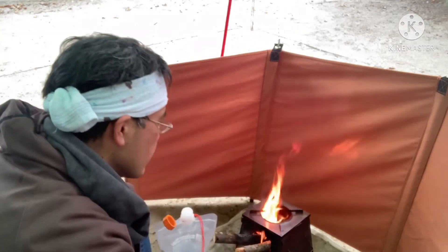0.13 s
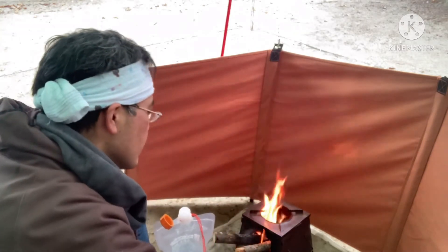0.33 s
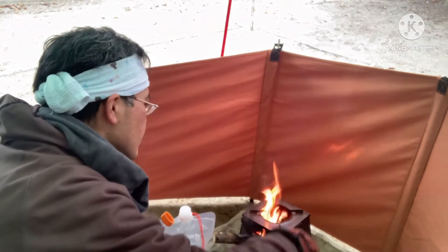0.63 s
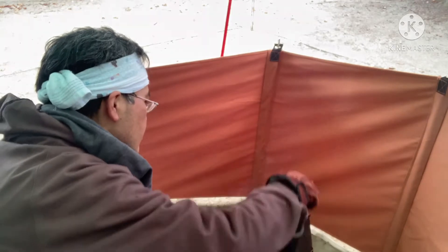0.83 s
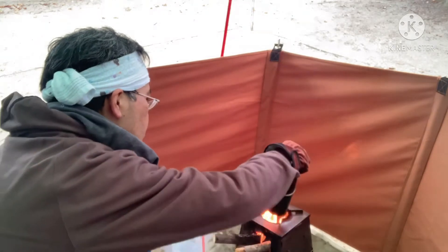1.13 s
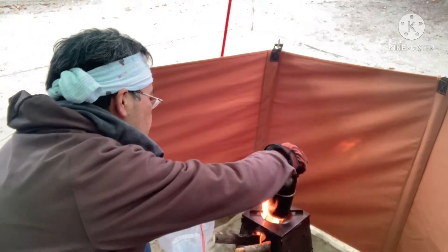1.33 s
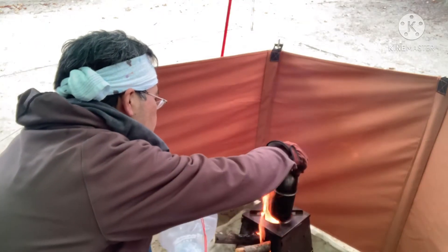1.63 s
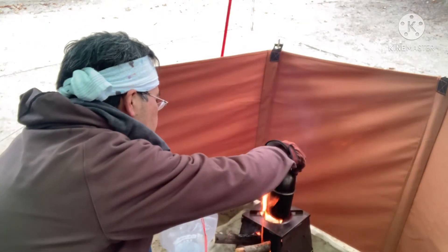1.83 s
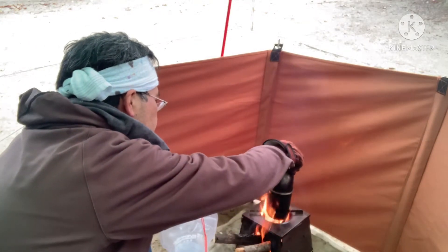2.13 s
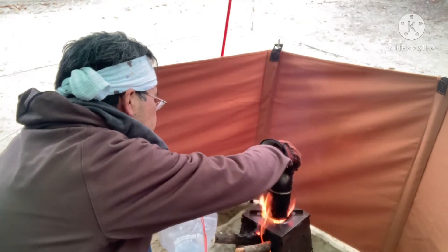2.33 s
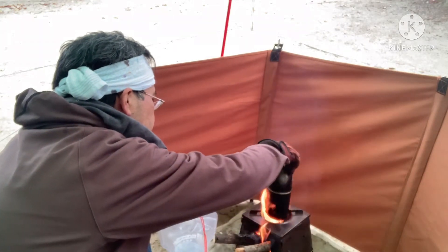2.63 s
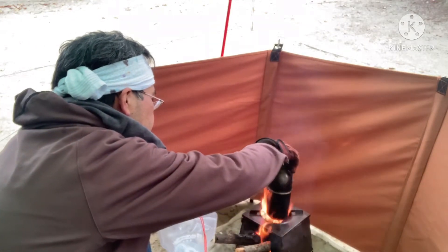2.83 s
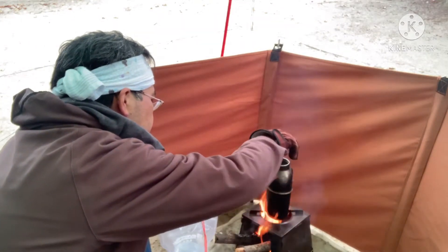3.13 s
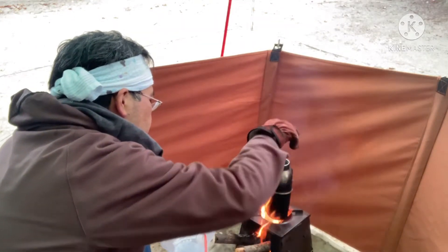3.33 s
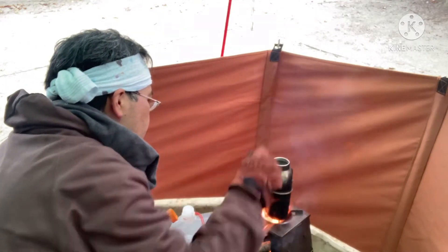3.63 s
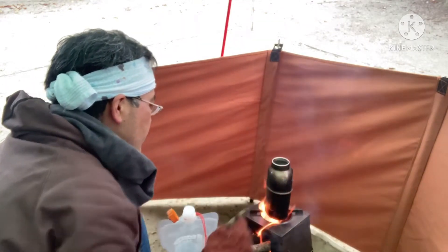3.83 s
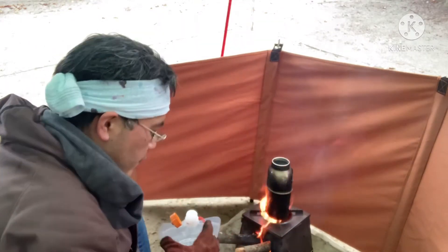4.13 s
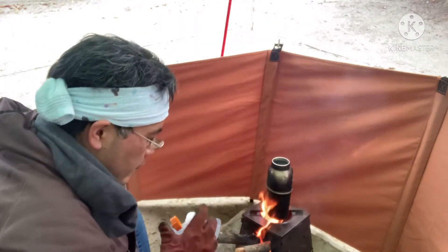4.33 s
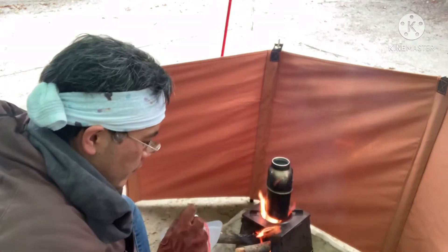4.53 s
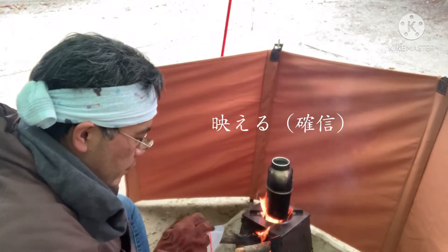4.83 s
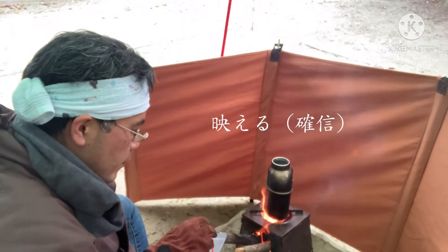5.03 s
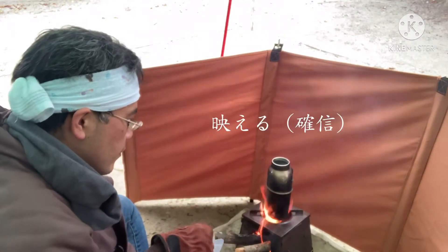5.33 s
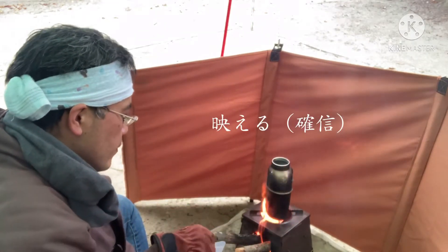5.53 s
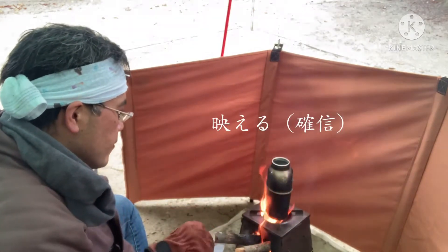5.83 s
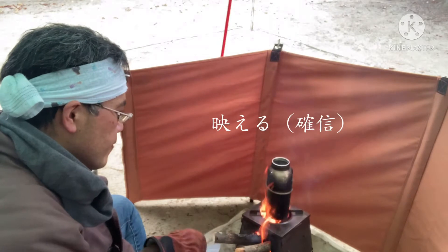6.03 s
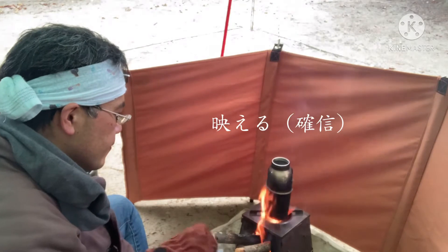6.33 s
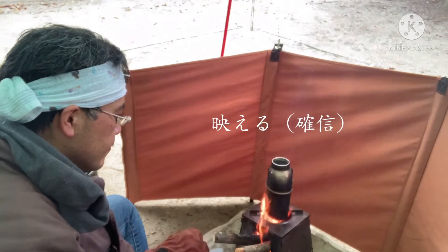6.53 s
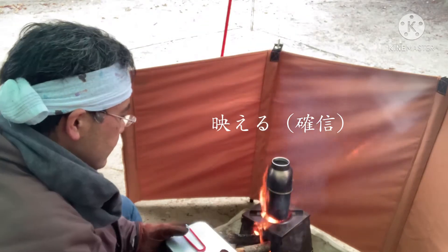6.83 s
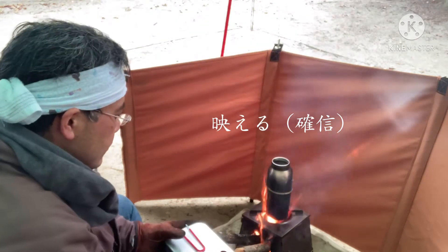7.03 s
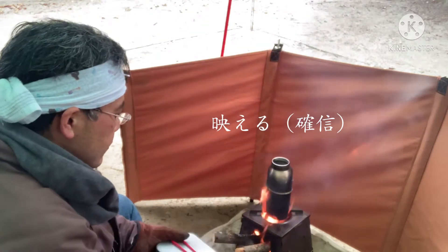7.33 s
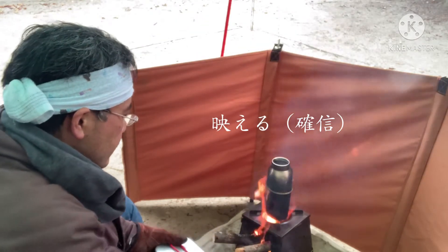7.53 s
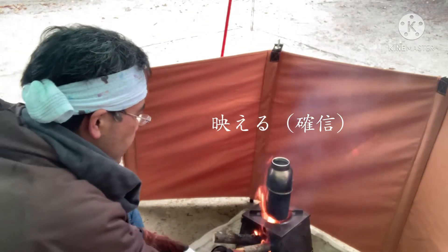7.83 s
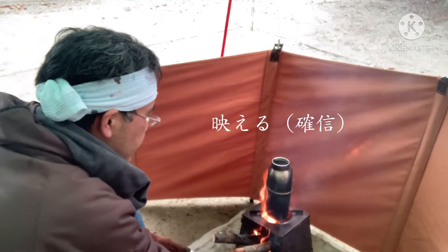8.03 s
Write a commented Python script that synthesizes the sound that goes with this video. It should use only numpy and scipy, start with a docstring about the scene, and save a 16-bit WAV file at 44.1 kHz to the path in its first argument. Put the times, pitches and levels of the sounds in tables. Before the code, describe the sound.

A close stereo pickup in a rain shelter: broadband rain wash, dense small taps on taut cloth and wet little blips throughout. Tiny dry fire snaps and short steam hisses come at random. One bright steel clank with a short ring is followed by two faint nudges and a tiny squeak. Midway, plastic knocks hollowly, one much louder; after a brief fade out and in, a jacket rustles and bumps softly.

```python
"""Steady rain patters on a tarp, as damped swings of taut cloth over a broadband wash and bubble blips.
Filtered noise makes a low rumble; bursts of noise make a small wood fire tick and sizzle in a steel camp stove.
A steel bottle clanks on the stove as a sum of decaying modes, then scrapes through friction resonances.
Later hollow plastic gear knocks with its own modes as it is put down, and a jacket rustles as shaped noise.
The level dips briefly near the end."""
import sys
import numpy as np
from scipy import signal
from scipy.fft import rfft, irfft, next_fast_len
from scipy.io import wavfile
from scipy.ndimage import uniform_filter1d, map_coordinates

SR = 44100
rng = np.random.default_rng(int(sys.argv[2]) if len(sys.argv) > 2 else 0)


def store_pcm(level_fs):
    """Save levels as 16-bit WAV."""
    pcm = np.round(np.clip(level_fs, -1, 1) * 32767).astype(np.int16)
    wavfile.write(sys.argv[1], SR, np.atleast_2d(pcm).T)


N = 361619

# relative noise spectrum of plastic scuffing on the ground: freq_hz, density_db (per Hz)
SCUFF_SPECTRUM = [(300, 3), (1000, 5.5), (2800, -0.5), (4500, -6.5), (8000, -21), (16000, -31.5)]


def amp(db):
    """Level law: decibels to an amplitude factor."""
    return 10 ** (np.asarray(db) / 20)


def unit(x):
    """Power normalisation: x scaled to rms 1."""
    return x / np.sqrt(np.mean(x ** 2) + 1e-20)


def along(points, hz):
    """Interpolation of (frequency, value) points on a logarithmic frequency axis."""
    point_hz, value = np.transpose(points)
    return np.interp(np.log(hz + 1), np.log(point_hz), value)


def curves(rows):
    """Linear interpolation in time: one value per sample for each column after the time."""
    s, *columns = np.transpose(rows)
    return [np.interp(np.arange(N) / SR, s, column) for column in columns]


def wobble(rate):
    """Band-limited random modulation: a smooth curve through rate random knots a second."""
    knots = rng.standard_normal(int(N * rate / SR) + 4)
    return map_coordinates(knots, [np.arange(N) * rate / SR])


def filtered(x, response):
    """Linear filtering: the spectrum of x times a response of frequency."""
    n = x.shape[-1]
    m = next_fast_len(n + 4096)
    return irfft(rfft(x, m) * response(np.fft.rfftfreq(m, 1 / SR)), m)[..., :n]


def noise(spectrum, size):
    """Diffuse-field coherence: coloured stereo noise of rms 1, nearly mono in the bass."""
    # correlation of left and right: freq_hz, likeness (-1 to 1)
    likeness = [(50, 1), (130, 0.87), (300, 0.63), (700, -0.18), (1500, 0.56), (4000, 0.46)]

    def response(hz):
        turn = np.arccos(np.clip(along(likeness, hz), -1, 1)) / 2  # shares power between mid and side
        return amp(along(spectrum, hz)) * [np.cos(turn), np.sin(turn)]

    mid, side = filtered(rng.standard_normal((2, size)), response)
    return unit(np.array([mid + side, mid - side]))


def fade(t, t60):
    """Exponential damping: a decay of 60 dB in t60 seconds."""
    return np.exp(-np.log(1000) * t / t60)


def ring(modes, t):
    """Modal superposition: damped modes, struck at slightly random strengths and at random phases."""
    return sum(amp(db + rng.standard_normal()) * fade(t, t60)
               * np.sin(2 * np.pi * (hz * t + rng.random())) for hz, db, t60 in modes)


def add(track, s, sound):
    """Linear superposition: mix a sound into a stereo track at time s."""
    part = track[:, max(round(s * SR), 0):][:, :sound.shape[-1]]
    part += sound[..., :part.shape[1]]


def strokes(rows):
    """Speed of a rubbing movement (s, length s, dB): the gain rises and falls in a smooth bell."""
    t = np.arange(N) / SR
    return sum(amp(db) * np.exp(-(2 * (t - s) / length) ** 2) for s, length, db in rows)


def patchy(x, depth_db):
    """Time-frequency modulation: stereo sound at rms 1 whose colour shifts in small random patches."""
    z = signal.stft(x, nperseg=256)[2]
    field = rng.standard_normal(z.shape[1:])
    field = uniform_filter1d(field, size=4, axis=0)
    field = uniform_filter1d(field, size=7, axis=1)
    shifted = z * amp(depth_db * unit(field))
    return unit(signal.istft(shifted, nperseg=256)[1][:, :x.shape[1]])


def taps(s, db, hz, pan_db, cycles, spread_s):
    """Damped membrane: a drop dents taut cloth, which swings about once and reaches each microphone at a lag."""
    steps = np.arange(256)
    lag = spread_s * rng.uniform(-1.022, 1, len(s))
    place = (np.round(s * SR).astype(int)[:, None] + steps).ravel().clip(0)
    pair = []
    for side in (1, -1):
        delay = (spread_s + side * lag[:, None]) / 2
        phase = np.maximum(steps / SR - delay, 0) * hz[:, None]
        dent = np.sin(np.pi * phase) ** 2 * np.exp(-phase / cycles)
        swing = np.gradient(dent, axis=1)  # the air follows the speed of the cloth
        swing /= np.abs(swing).max(axis=1, keepdims=True)
        level = amp(db + side * pan_db / 2)[:, None]
        pair.append(np.bincount(place, (level * swing).ravel(), N)[:N])
    return np.array(pair)


def patter(per_s, centre_hz, octaves, size_db):
    """Random arrivals: countless small taps of random place, pitch and size, at rms 1."""
    u = rng.random((int(per_s * N / SR), 3))
    hz = np.clip(centre_hz * 2 ** (octaves * rng.standard_normal(len(u))), 500, 12000)
    size = np.minimum(-np.log(1 - u[:, 1]), 3.2)  # exponential spread of sizes
    pan_db = 4 * (2 * u[:, 2] - 1)
    return unit(taps(u[:, 0] * N / SR, size_db * size, hz, pan_db, cycles=0.69, spread_s=0.000394))


def drips():
    """Bubble resonance: drops into shallow water leave tiny bubbles, short blips of rising pitch, at rms 1."""
    per_s, middle_hz, spread_octaves = 55, 1950, 0.493
    life_cycles, rise_per_s, size_db = 3.3, 4, 2.5  # the pitch rises by this share of itself a second
    out, t = np.zeros((2, N)), np.arange(SR // 40) / SR
    for when, pitch, size, place in rng.random((int(per_s * N / SR), 4)):
        hz = middle_hz * 2 ** (spread_octaves * np.arctanh(0.98 * (2 * pitch - 1)))
        turns = hz * t * (1 + rise_per_s * t / 2)
        life = (1 - np.exp(-turns)) * np.exp(-turns / life_cycles)
        lag = np.array([[1], [-1]]) * (place - 0.5) * 0.5  # cycles, opposite at the two microphones
        level = amp(size_db * min(-np.log(1 - size), 3))
        add(out, when * N / SR, level * life * np.sin(2 * np.pi * (turns + lag)))
    return unit(out)


def shelter(x, echo_s, echo_db, tail_db, t60):
    """Early reflections: ground and windscreen return a quick echo and a short scatter."""
    t = np.arange(SR // 8) / SR
    tail = rng.standard_normal((2, len(t))) * fade(t, t60)
    answer = amp(tail_db) * tail / np.linalg.norm(tail[0])
    answer[:, 0] += 1  # the direct sound
    answer[:, round(echo_s * SR)] += amp(echo_db)
    return signal.fftconvolve(x, answer, axes=1)[:, :N]


def rain():
    """Summed random impacts: a far wash, splashes and drips on the ground, and drops of all sizes on the tarp."""
    # the shower eases and picks up again: time_s, level_db (before the offset of each layer)
    rain_course = [(0, -49), (0.6, -51), (1.7, -49), (2.15, -50.5), (2.45, -52), (3.1, -50.5), (3.5, -54),
                   (3.75, -49), (4.25, -52), (4.9, -50), (5.6, -50.5), (6.25, -52.5), (6.75, -46.5),
                   (7.0, -47), (8.2, -48.5)]
    # relative spectrum of the far wash: freq_hz, density_db (per Hz)
    wash_spectrum = [(60, -15), (200, -7), (450, 5.5), (900, 2), (1700, -5), (3000, -2), (5000, -7.5),
                     (7500, -10.5), (11000, -21), (16000, -17.5)]
    # big drops just overhead: start_s, peak_db, pitch_hz, left_minus_right_db
    big_drops = [(0.016, -26.5, 1930, -2), (0.180, -19.5, 1120, 4), (0.478, -28, 1580, -3),
                 (0.507, -28, 1250, -8), (0.75, -34, 2300, 1), (0.835, -26.5, 1420, 8),
                 (0.911, -31.5, 1150, 0), (1.079, -32, 1500, 0), (1.224, -27.5, 940, 10),
                 (1.251, -29.5, 986, 5.5), (1.558, -23, 1620, 4), (2.194, -25, 1690, 0),
                 (2.364, -28.5, 2090, 3), (2.675, -27, 1590, 0), (2.776, -33.5, 1200, 2),
                 (2.958, -29.5, 1200, 0), (3.040, -31, 2700, 3), (3.118, -32, 1100, 1.5),
                 (3.615, -21.5, 1540, -1), (3.696, -21, 1910, -3), (3.729, -26, 1370, -5),
                 (3.842, -29.5, 1800, -2.5), (3.949, -29, 1500, -1), (4.195, -33.5, 1300, -4),
                 (4.269, -35, 1020, 11), (4.313, -28, 1580, -1), (4.435, -27, 1460, -1.5),
                 (4.461, -25, 1290, -1), (4.477, -27, 1350, 0), (4.626, -25.5, 2537, 4),
                 (4.720, -31, 1310, -1), (5.237, -27.5, 1300, -8), (5.316, -29.5, 1450, 0),
                 (5.437, -19, 3500, 1), (6.382, -27, 1850, 0), (6.407, -21, 1720, -2),
                 (6.867, -21, 1800, -1), (7.069, -26, 1280, 0), (7.092, -21, 1920, 1),
                 (7.426, -26, 1916, 2.5), (7.646, -27, 1340, 2), (7.803, -22.5, 2070, 2),
                 (7.824, -27.5, 1250, -6), (7.878, -27.5, 2000, 0), (7.959, -21.5, 1130, -3),
                 (8.035, -29, 900, 4), (8.108, -28.5, 2000, 0), (8.19, -24, 2100, 1)]
    flutter_db, flutters_per_s = 0.5, 9  # chance swells of the whole shower
    rain_db = curves(rain_course)[0] + flutter_db * wobble(flutters_per_s)

    wash_db = rain_db - 4.4 + 2.2 * wobble(14)
    wash = amp(wash_db) * patchy(noise(wash_spectrum, N), depth_db=3.0)
    splash_db = rain_db - 9.0 + 4.0 * wobble(14)
    splashes = patter(per_s=650, centre_hz=3850, octaves=0.52, size_db=5.0)
    splash = amp(splash_db) * patchy(splashes, depth_db=2.5)

    small_drops = patter(per_s=420, centre_hz=2130, octaves=0.73, size_db=5.5)
    small = amp(rain_db - 7.0) * patchy(small_drops, depth_db=2.5)
    medium_drops = patter(per_s=30, centre_hz=1710, octaves=0.44, size_db=0.5)
    medium = amp(rain_db - 9) * patchy(medium_drops, depth_db=3.5)
    blips = amp(rain_db - 11) * drips()
    big = taps(*np.transpose(big_drops), cycles=0.23, spread_s=0.00014)
    near = small + medium + big + blips
    return wash + splash + shelter(near, echo_s=0.0051, echo_db=-11.0, tail_db=-3.5, t60=0.077)


def rumble():
    """Low-frequency noise: the rumble of the outdoors, swaying by chance around its slow course."""
    # slow course of the rumble: time_s, level_db
    rumble_course = [(0, -36), (0.45, -40.5), (1.0, -37.5), (1.9, -39), (3.7, -37.5), (4.1, -40.5),
                     (5.1, -39.5), (5.8, -37.5), (6.9, -40), (7.6, -37), (7.87, -42), (8.2, -37)]
    # relative spectrum of the rumble: freq_hz, density_db (per Hz)
    rumble_spectrum = [(15, -21), (28, -32), (42, -7), (55, -1), (70, -3), (95, -6.5), (130, -14.5),
                       (200, -24.5), (350, -32), (900, -68)]
    sway_db, sways_per_s = 0.5, 8
    level_db = curves(rumble_course)[0] + sway_db * wobble(sways_per_s)
    return amp(level_db) * noise(rumble_spectrum, N)


def fire():
    """Impulsive and turbulent noise: wood splits in tiny snaps, and moisture escapes in short sizzles."""
    # dry snaps of burning wood: start_s, level_db, tilt_db_per_octave
    snap_rows = [(0.350, -35, 1.5), (0.507, -36, -1), (0.79, -32.5, -1.5), (0.835, -39, -1),
                 (0.922, -40, 0.5), (1.251, -39, 2.5), (2.194, -29, -0.5), (2.217, -36, -0.5),
                 (2.248, -37.5, 0), (2.66, -39, 0.5), (2.82, -41, 2), (3.040, -31, 0), (3.118, -39, 1),
                 (3.22, -40.5, 1), (3.452, -33, -1), (3.614, -28, 0.5), (3.696, -36, -1),
                 (3.728, -37, -0.5), (3.949, -38.5, 0), (3.965, -41.5, 1.5), (4.269, -32.5, 0),
                 (4.461, -33, -0.5), (5.237, -31, 0), (5.57, -35.5, 1), (5.678, -30.5, -1), (5.935, -42, 4),
                 (6.867, -38, -1), (7.231, -30, 1), (7.959, -37, 0.5), (8.035, -26.5, 0.5)]
    # relative spectrum of splitting wood before the tilt: freq_hz, density_db (per Hz)
    snap_spectrum = [(300, 11), (1200, 13.5), (3000, 7), (6000, 5.5), (10000, -4.5), (16000, -23)]
    # short sizzles: start_s, level_db
    sizzle_rows = [(0.136, -47.5), (0.170, -41.5), (0.791, -50), (1.5, -46), (2.121, -49.5), (3.678, -50),
                   (4.815, -48.5), (5.954, -45.5), (6.885, -41), (7.175, -47), (7.35, -45.5),
                   (7.658, -46.5), (7.701, -47.5), (7.742, -46.5), (7.976, -39.5), (8.035, -53),
                   (8.101, -43), (8.145, -45.5)]
    # relative spectrum of escaping steam: freq_hz, density_db (per Hz)
    steam_spectrum = [(500, -48), (3000, -18), (6500, 6), (11000, -1), (14500, -3), (16000, -0.5)]
    attack_s, sizzle_t60_s = 0.00045, 0.13
    snaps, sizzles, t = np.zeros((2, N)), np.zeros((2, N)), np.arange(SR // 4) / SR
    for s, db, tilt_db in snap_rows:
        colour = [(hz, level + tilt_db * np.log2(hz)) for hz, level in snap_spectrum]
        add(snaps, s, amp(db) * fade(t, 0.011) * noise(colour, len(t)))
    puff = (1 - np.exp(-t / attack_s)) * fade(t, sizzle_t60_s)
    for s, db in sizzle_rows:
        add(sizzles, s, amp(db) * puff * noise(steam_spectrum, len(t)))
    embers = amp(-64.5) * patter(per_s=37, centre_hz=5700, octaves=0.99, size_db=4)
    return sizzles + shelter(snaps + embers, echo_s=0.0033, echo_db=-12.0, tail_db=-3.0, t60=0.14)


def rustle():
    """Dry friction: heavy cloth rubs unevenly with each movement and its folds flick over."""
    # movements of the jacket: centre_s, length_s, peak_db
    moves = [(3.67, 0.047, -45.5), (4.9, 0.53, -52), (6.2, 1, -51.5), (6.83, 0.15, -43.5),
             (6.99, 0.07, -49.5), (7.17, 0.1, -37), (7.34, 0.25, -43), (7.58, 0.24, -41.5),
             (7.77, 0.13, -49), (8.0, 0.17, -43.5)]
    # relative spectrum of rubbing cloth: freq_hz, density_db (per Hz)
    cloth_spectrum = [(40, -28), (110, 5.5), (190, 5.5), (270, -1), (370, -0.5), (550, -12), (950, -8),
                      (1400, -22), (2000, -16), (6000, -29.5), (16000, -45.5)]
    rest_db = -54  # the jacket is never quite still
    unevenness_db = 1.7 * wobble(60) + 0.8 * wobble(13)
    rub = patchy(amp(unevenness_db) * noise(cloth_spectrum, N), depth_db=2.5)
    folds = amp(-14) * patter(per_s=160, centre_hz=870, octaves=0.71, size_db=0.5)
    return np.hypot(amp(rest_db), strokes(moves)) * (rub + folds)


def clank():
    """Plate vibration: the bottle chatters on sheet steel; many fine partials die fast and a few ring on."""
    # the bottle lands on the stove and is nudged into place: start_s, level_db, hardness_db
    contacts = [(1.387, -16.5, 0), (1.647, -33.5, -11), (1.838, -34.5, -12.5)]
    # modes of bottle and stove together: freq_hz, level_db, t60_s
    steel_modes = [(302, -5, 0.22), (602, 4, 0.13), (690, -10.5, 0.47), (851, 2.5, 0.11), (1150, 7, 0.092),
                   (1576, 2.5, 0.1), (1740, -6, 0.29), (2700, -13, 0.43), (2961, -15, 0.55),
                   (3967, -17, 0.36), (4442, -21, 0.7), (4560, -18.5, 1.35), (4900, -14, 0.35),
                   (5000, -18, 0.75), (5270, -10, 0.46), (5728, -20, 0.73), (6052, -21, 0.6),
                   (6300, -9.5, 0.63), (6350, -10, 0.56), (7068, -24, 0.9), (8140, -4.5, 0.24),
                   (11000, -1, 0.14)]
    # relative spectrum of the chatter: freq_hz, density_db (per Hz)
    crash_spectrum = [(100, -21), (300, -26), (800, 7.5), (2500, 1), (5000, 0), (8000, 4.5), (11000, -1),
                      (16000, -13.5)]
    hard_above_hz = 4500
    shimmer_db, shimmers_per_s = 2.5, 33.4  # the held bottle rocks, so its ring is uneven
    out, t = np.zeros((2, N)), np.arange(SR) / SR
    short = t[:SR // 3]

    # a thin plate spreads its modes about evenly over frequency
    partial_hz = np.linspace(2300, 15800, 120) + rng.uniform(-55, 55, 120)
    count = len(partial_hz)
    partial_t60 = rng.uniform(0.088, 0.19, (count, 1)) * (partial_hz[:, None] / 8000) ** -0.2
    partials = np.exp(2j * np.pi * partial_hz[:, None] * short) * fade(short, partial_t60)

    for s, db, hard_db in contacts:
        modes = [(hz, level + hard_db * min(hz / hard_above_hz, 1), t60) for hz, level, t60 in steel_modes]
        strengths = unit(rng.uniform(0.29, 1, (2, count)))
        strengths = strengths * np.exp(2j * np.pi * rng.random((2, count)))  # random phases
        clatter = amp(hard_db - 1.5) * (strengths @ partials).real / np.sqrt(count / 2)
        flutter = amp(4.1 * wobble(270)[:len(t)])
        chatter = amp(hard_db - 6.5) * flutter * fade(t, 0.23) * noise(crash_spectrum, len(t))
        shimmer = amp(shimmer_db * wobble(shimmers_per_s)[:len(t)])
        middle = shimmer * amp(-16) * ring(modes, t)
        side = shimmer * amp(-18) * ring(modes, t)
        blow = chatter + np.array([middle + side, middle - side])
        add(blow, 0, clatter)
        add(out, s, amp(db) * (1 - np.exp(-t / 0.0035)) * blow)
    return out


def scrape():
    """Friction-driven resonance: each twist excites a few resonances of the steel, and one mode sings on."""
    # the bottle is turned on the stove in short twists: centre_s, length_s, peak_db
    twists = [(2.047, 0.069, -53), (2.125, 0.065, -52)]
    # resonances of steel sliding on steel: freq_hz, width_hz, level_db
    squeaks = [(1200, 200, -10), (1840, 150, 0), (3141, 120, -6), (4900, 500, -20), (14300, 600, -7)]
    sing_at_s, sing_length_s, sing_hz, sing_db = 2.09, 0.12, 4576, -60.5
    friction = amp(4.5 * wobble(97)) * rng.standard_normal((2, N))

    def steel(f):
        return sum(amp(db) * 1j * f * width / (hz * hz - f * f + 1j * f * width)
                   for hz, width, db in squeaks)

    tone = np.sin(2 * np.pi * sing_hz * np.arange(N) / SR)
    sing = strokes([(sing_at_s, sing_length_s, sing_db)]) * tone
    return strokes(twists) * unit(filtered(friction, steel)) + sing


def thuds():
    """Heavy damping: a padded blow gives one dull, quickly damped tone."""
    # soft thuds of the sleeve against the tray: start_s, level_db, pitch_hz
    thud_rows = [(3.655, -35.5, 250), (6.835, -36, 350), (7.148, -35, 415), (7.172, -27, 202),
                 (7.236, -29, 337), (7.24, -28.5, 185), (7.54, -33.5, 387)]
    attack_s, t60_s = 0.0039, 0.1
    out, t = np.zeros((2, N)), np.arange(SR // 6) / SR
    for s, db, hz in thud_rows:
        envelope = (1 - np.exp(-t / attack_s)) * fade(t, t60_s)
        add(out, s, amp(db) * envelope * np.sin(2 * np.pi * hz * t))
    return out


def hollow(t, tuning):
    """Impulse response of the plastic body: after one push all its modes start together."""
    # modes of the hollow plastic: freq_hz (before tuning), level_db, t60_s
    plastic_modes = [(352, -18.5, 0.038), (448, -19, 0.037), (695, -20.5, 0.043), (861, -11, 0.05),
                     (950, -5, 0.037), (1006, -5.5, 0.026), (1190, -22, 0.036), (1560, -20, 0.03)]
    return sum(amp(db) * fade(t, t60) * np.sin(2 * np.pi * hz * tuning * t) for hz, db, t60 in plastic_modes)


def knocks():
    """Modal impact: hollow plastic and the struck wall ring; harder contacts add a bright clack and a scuff."""
    # knocks of plastic gear, tuned by the grip, each on a wall with its own tone:
    # start_s, level_db, brightness_db, tuning_factor, wall_hz, wall_db, wall_t60_s
    knock_rows = [(4.818, -25.5, -7, 1.07, 1910, -1, 0.026), (4.829, -22, -13.5, 1, 1300, -7, 0.035),
                  (4.97, -35, -14, 0.95, 1870, -14, 0.04), (4.98, -29, -11, 0.92, 1860, 0, 0.028),
                  (5.106, -28, -0.5, 0.95, 2710, -1.5, 0.025),
                  (5.536, -10, -16.5, 1.005, 2240, -18.5, 0.035),
                  (5.638, -34.5, -25, 0.94, 1700, -21, 0.03), (5.957, -24, -7.5, 1.03, 1580, 4, 0.015),
                  (6.032, -35, -1.5, 0.99, 2250, 3, 0.02), (6.157, -38.5, -20, 0.9, 1700, -15, 0.03),
                  (6.207, -38.5, 0.5, 1.05, 2250, 0, 0.03), (7.142, -39, -2, 0.95, 1040, -2, 0.15),
                  (7.169, -42, -10, 0.95, 1800, -10, 0.05), (7.233, -32.5, -15, 0.99, 1690, -5, 0.095),
                  (7.316, -37, 1, 0.97, 1018, -14, 0.06)]
    # brighter modes of the plastic, before tuning: freq_hz, level_db, t60_s
    clack_modes = [(1740, -5, 0.012), (2250, -8, 0.025), (2700, 2, 0.029), (3200, -10, 0.03),
                   (4030, -1, 0.017)]
    attack_s = 0.001
    out, t = np.zeros((2, N)), np.arange(SR // 6) / SR
    for s, db, bright_db, tuning, wall_hz, wall_db, wall_t60 in knock_rows:
        body = amp(3.0) * hollow(t, tuning) + ring([(wall_hz, wall_db, wall_t60)], t)
        clack_pair = np.array([ring(clack_modes, t * tuning), ring(clack_modes, t * tuning)])
        clack = amp(bright_db - 4.5) * clack_pair
        grit = unit(amp(3.0 * wobble(500)[:len(t)]) * noise(SCUFF_SPECTRUM, len(t)))
        scuff = amp(bright_db - 3.0) * fade(t, 0.11) * grit
        add(out, s, amp(db) * (1 - np.exp(-t / attack_s)) * (body + clack + scuff))
    return out


def pouch():
    """Sliding friction: a plastic pouch slides once along the ground, with an uneven hiss."""
    # relative spectrum of the hiss: freq_hz, density_db (per Hz)
    film_spectrum = [(700, -25), (2000, -14), (3300, -10), (4350, -5), (5000, -23.5), (10000, -20),
                     (13000, -27)]
    centre_s, length_s, level_db = 4.876, 0.31, -54
    return strokes([(centre_s, length_s, level_db)]) * amp(3.1 * wobble(45)) * noise(film_spectrum, N)


def drags():
    """Sustained excitation: friction on the ground keeps the hollow plastic humming under a gritty hiss."""
    # the plastic gear scuffs over the ground: centre_s, length_s, peak_db, grit_db
    drag_rows = [(5.066, 0.023, -43.5, 5), (6.002, 0.04, -44, -8), (6.043, 0.06, -49, 0.5)]
    body = hollow(np.arange(SR // 6) / SR, 0.97)
    hum = unit(signal.fftconvolve(rng.standard_normal(N), body)[:N])
    grit = unit(amp(2.8 * wobble(300)) * noise(SCUFF_SPECTRUM, N))
    return sum(strokes([(s, length, db)]) * (hum + amp(grit_db) * grit) for s, length, db, grit_db in drag_rows)


def dip():
    """Gain envelope: the level fades out, stays near silence for a moment and fades back in."""
    start_s, hold_s, floor_db = 6.572, 0.026, -48
    fall_s, rise_s = 0.125, 0.155
    t = np.arange(N) / SR - start_s  # zero where the hold begins
    return np.clip(np.maximum(-t / fall_s, (t - hold_s) / rise_s), amp(floor_db), 1)


def scene():
    """Superposition of everything under the tarp, over the low rumble of the outdoors."""
    weather = rain() + rumble()
    stove = fire() + clank()
    gear = knocks() + drags() + thuds() + rustle() + pouch()
    return weather + stove + gear + scrape()


def record(dry):
    """Mid-side response: the microphone pair colours sum and difference; the level dips; the band is limited."""
    # opposite phase dominates near 9 kHz, equal phase above 12 kHz
    # response to the sum of left and right: freq_hz, gain_db
    mid_gain = [(3000, 2), (5000, 3), (7600, 0.5), (9000, -19.5), (10500, 0.5), (12000, 5), (15000, 5)]
    # response to their difference: freq_hz, gain_db
    side_gain = [(2500, 3.5), (4500, 3), (8500, 7), (11000, 9), (12500, -1), (14000, -24)]
    top_hz = 15900
    left, right = dry
    mid = filtered((left + right) / 2, lambda hz: amp(along(mid_gain, hz)))
    side = filtered((left - right) / 2, lambda hz: amp(along(side_gain, hz)))
    pair = np.array([mid + side, mid - side])
    return filtered(dip() * pair, lambda hz: hz < top_hz)


dry = scene()
out = record(dry)
store_pcm(out)
```